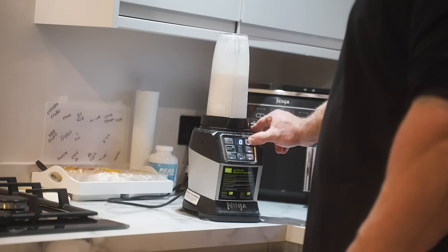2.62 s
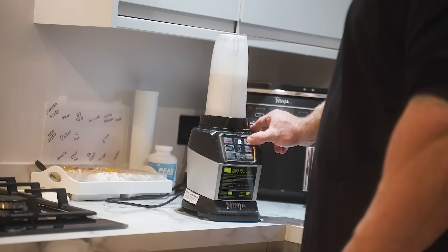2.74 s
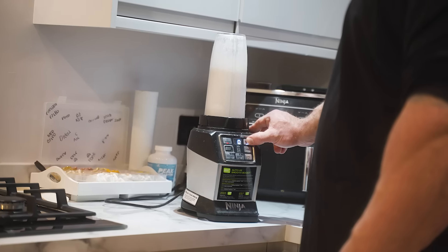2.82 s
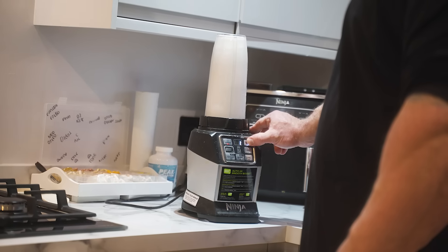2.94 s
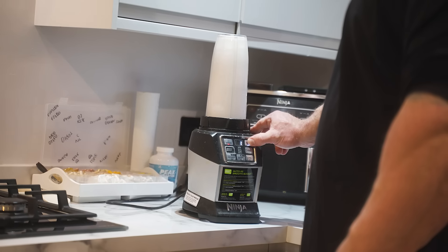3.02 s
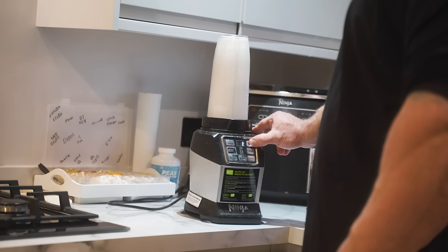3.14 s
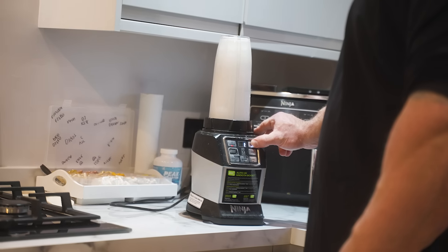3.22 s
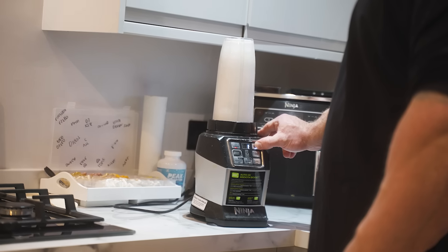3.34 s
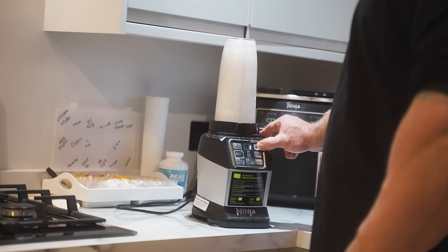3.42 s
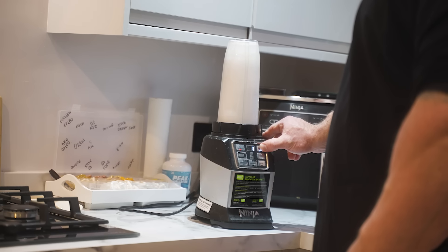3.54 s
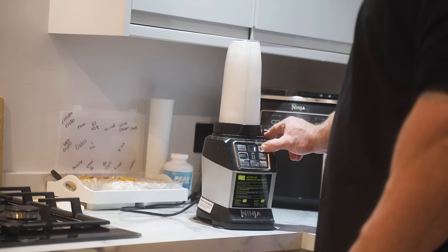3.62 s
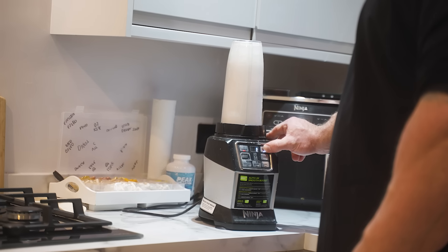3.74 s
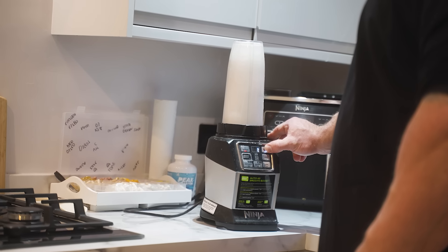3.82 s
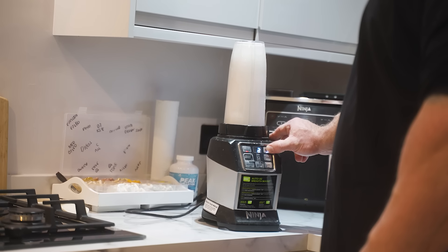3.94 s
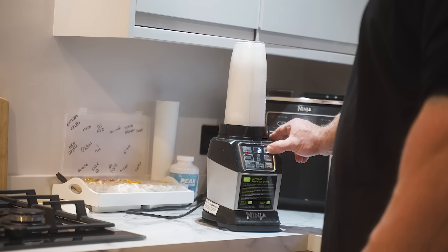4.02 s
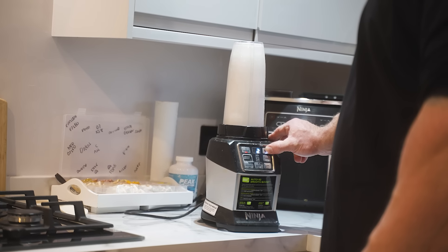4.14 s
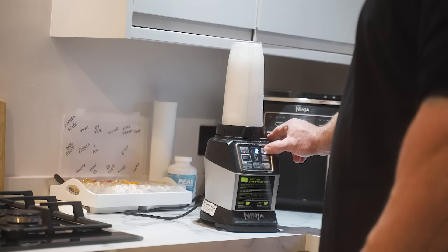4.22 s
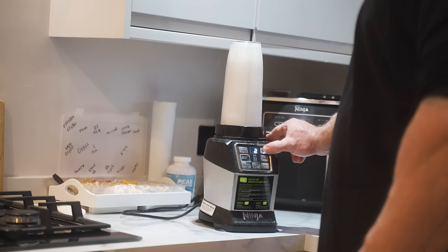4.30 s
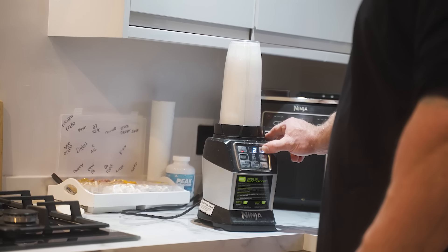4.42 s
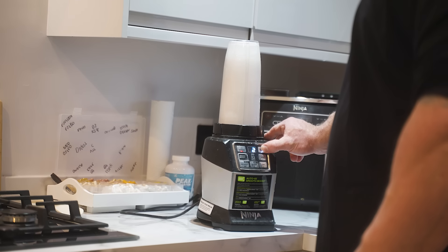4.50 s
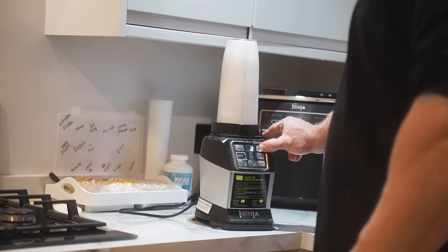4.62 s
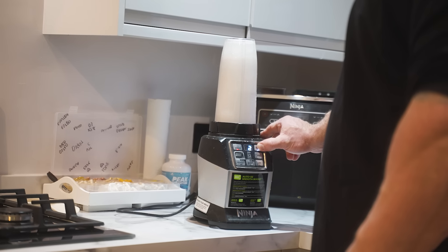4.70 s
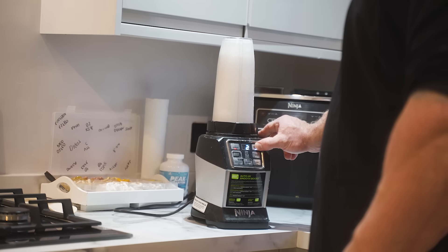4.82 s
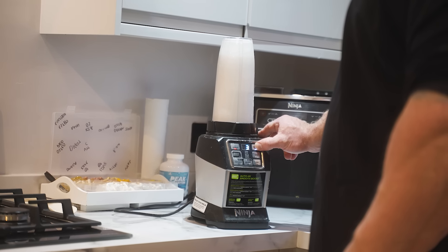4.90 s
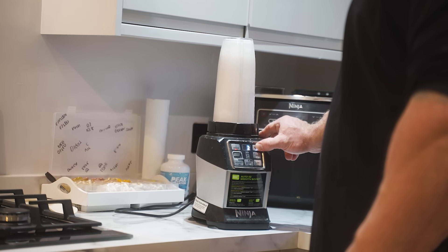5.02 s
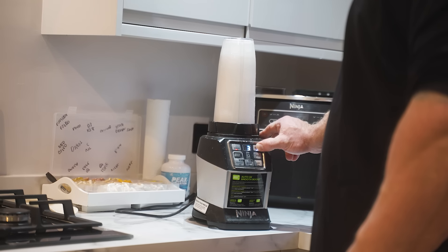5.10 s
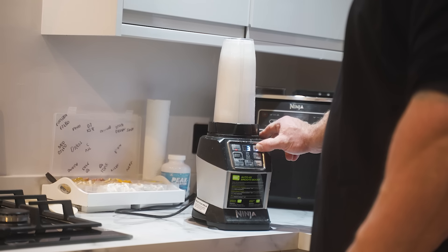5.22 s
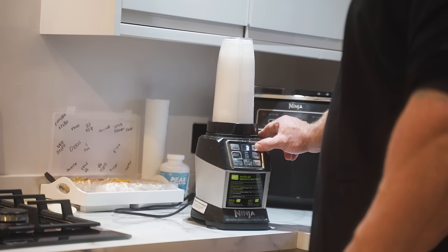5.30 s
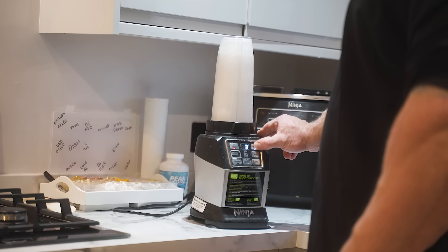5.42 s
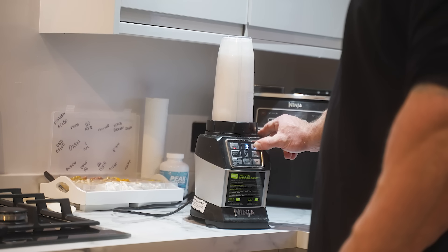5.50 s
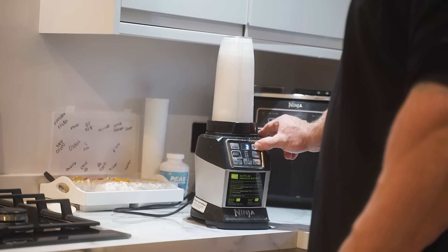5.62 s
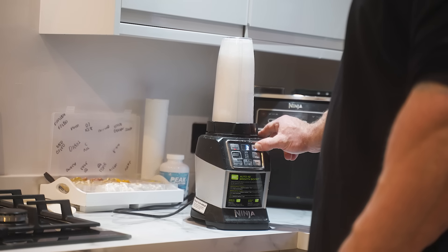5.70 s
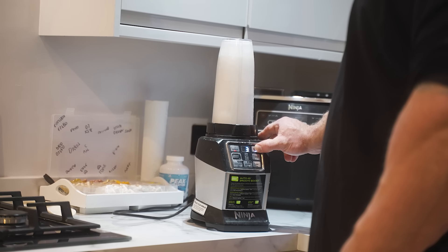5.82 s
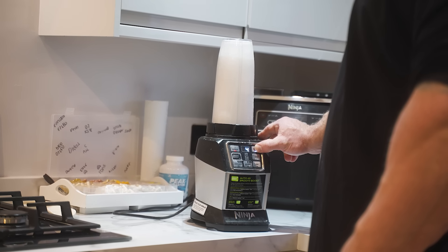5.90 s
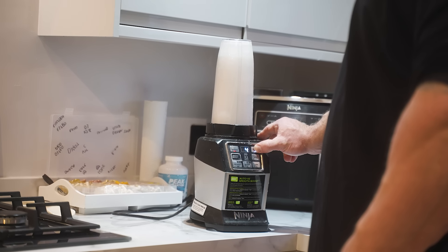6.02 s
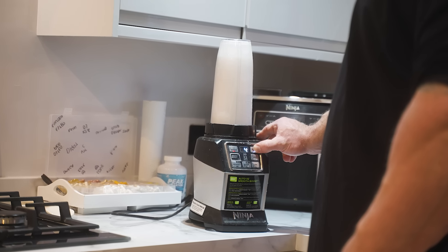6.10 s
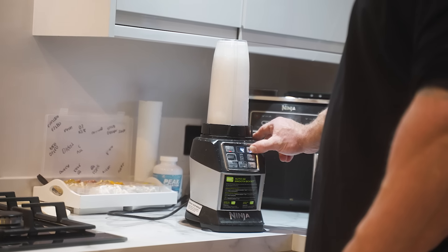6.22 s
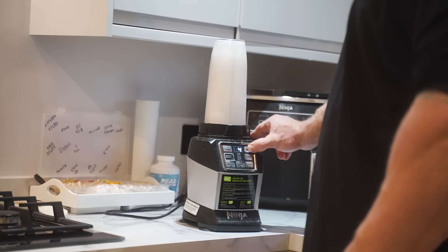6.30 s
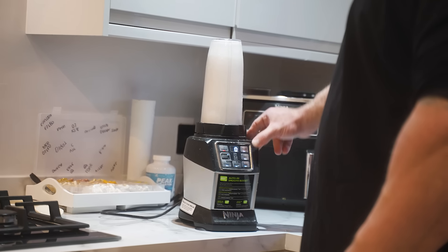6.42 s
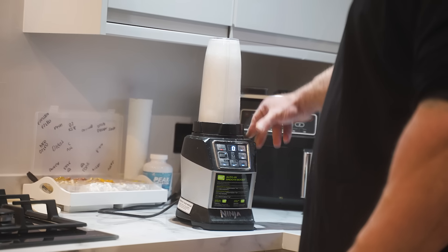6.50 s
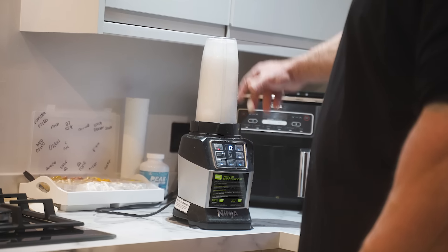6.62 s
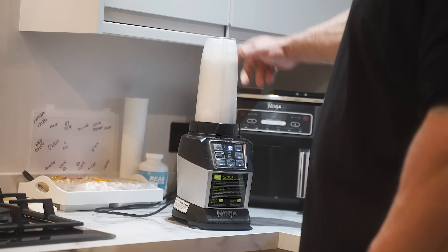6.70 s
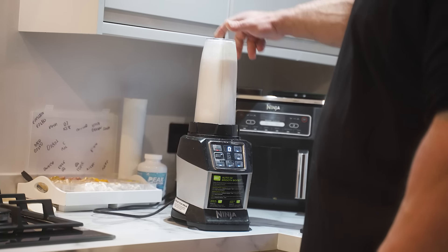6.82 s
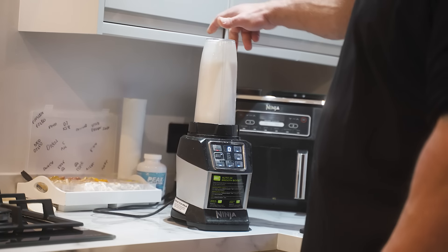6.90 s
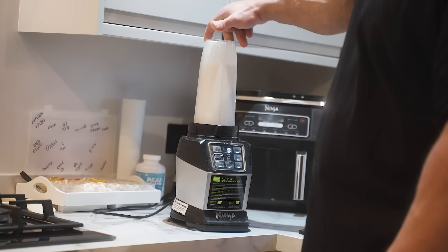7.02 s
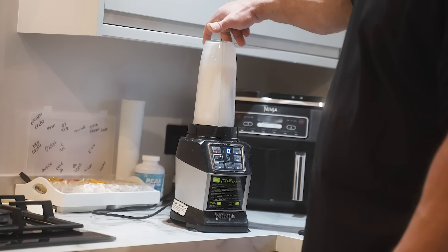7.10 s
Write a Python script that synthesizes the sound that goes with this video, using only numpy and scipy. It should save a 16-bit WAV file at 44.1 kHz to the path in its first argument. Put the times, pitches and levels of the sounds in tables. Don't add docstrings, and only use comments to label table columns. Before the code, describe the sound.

Close in a home kitchen, a small blender snaps on and roars through ice and slush for just over a second, then coasts down with lumps knocking the cup. A brief near-silence and a small click follow, then a longer, steady whirring roar of several seconds, falling in pitch at the end. Phone-like mono microphone, pauses gated to a faint hush.

```python
import sys
import numpy as np
from scipy import signal
from scipy.fft import rfft, irfft
from scipy.io import wavfile
from scipy.ndimage import uniform_filter1d

SR = 44100
rng = np.random.default_rng(int(sys.argv[2]) if len(sys.argv) > 2 else 0)


def how_loud(loudness_db):
    steps = np.asarray(loudness_db, float) / 20
    return 10 ** steps


def generate_wav(signal):
    frames = np.transpose(np.atleast_2d(signal))
    scaled = np.clip(frames, -1, 1) * 32767
    pcm = np.round(scaled).astype(np.int16)
    wavfile.write(sys.argv[1], SR, pcm)


N = 315315
T = np.arange(N) / SR
HZ = np.fft.rfftfreq(N, 1 / SR)

FULL_HZ, TOP_HZ = 289, 15760
COAST_S, FRICTION_HZ = 0.97, 75
FULL_CHURN_DB = -35
COAST_RING = 1.1
HUSH_DB, TAIL_S, HUSH_TREBLE_DB, RUMBLE_DB = -75, 0.035, -24.5, -89

# start in seconds, end in seconds.
RUNS_S = [
    (.1435, 2.678),
    (2.8045, 7.2),
]
# time in seconds, speed in Hz.
POWERED_HZ = [
    [(.144, 5), (.2, 170), (.3, 246), (.4, 267), (.5, 278), (.65, 291), (1, 294), (1.392, 292)],
    [(2.806, 5), (2.87, 170), (3, 243), (3.2, 285), (3.27, 289), (3.4, 285), (3.9, 288), (4.8, 289.5),
     (6.45, 288.5)],
]
# time in seconds, level in dB.
CHURN_DB = [
    [(.15, -47), (.47, -33.5), (1.38, -35), (1.93, -47), (2.2, -50), (2.35, -51.5), (2.43, -56), (2.5, -57),
     (2.67, -62)],
    [(2.81, -45.5), (2.91, -41.5), (3.06, -38), (3.3, -34.5), (4.3, -35), (5.3, -35.5), (6.44, -35.5),
     (6.9, -47), (7.15, -50.5)],
]
ROAR_EDGES_HZ = [1500, 4400, 8800]
# level in dB at full churn, gain in dB per dB of weaker churn,
# growth in dB per second as ice gets finer, change in dB once the blade slows.
ROAR_SHARES = [
    (-5, 0.29, 0.32, -0.05),
    (-0.1, 0.0617, 0.13, -0.4),
    (-11, 0.26, .5, -3.5),
    (-23, 0.26, .1, -3.5),
]
# frequency in Hz, level in dB per Hz.
FAST_COLOUR = [(53, -72), (90, -32.5), (290, -3.5), (338, -4.5), (515, -4), (578, -7.5), (649, -6),
               (865, 0), (1630, -15), (2010, -2.5), (2340, -5.5), (3370, 1), (4330, -12), (8800, -17),
               (11400, -50), (19400, -120)]
# frequency in Hz, level in dB per Hz.
SLOW_COLOUR = [(53, -86), (90, -50), (169, -22.5), (307, 0.5), (386, -5), (409, -9.5), (771, -4.5),
               (1480, -12), (2050, -5.5), (2390, -9), (3120, -4), (5240, -19.5), (8800, -29.5),
               (11400, -65), (19400, -120)]
# frequency in Hz, level in dB per Hz.
AIR_COLOUR = [(4710, -30), (8000, -24), (8720, -32), (8950, -9.5), (11200, -9), (14100, -11),
              (15600, -15.5)]
# frequency in Hz, width in Hz, lift in dB.
BODY_MODES = [(162.3, 24, 9.5), (290, 49, 0), (738, 38, 3), (890, 55, 1.5), (2066, 31, 3.5), (2044, 42, 2),
              (2930, 124, 3.5), (3370, 63, 0.5), (3750, 150, 4.5), (3990, 25, 5), (4540, 18, -0.5),
              (8820, 290, -5), (10500, 320, 5)]
# first pulse level in dB, second pulse level in dB,
# loss in dB per Hz under full speed powered, the same coasting.
UNBALANCE = [(-44.5, -44.5, .25, .11), (-55, -47.5, .2, .25), (-62, -48, .3, .1)]
# flutter in dB, wander in Hz per order.
WOBBLE = [(1.0, .6), (1.2, .6), (4.5, 2.5)]
# time in seconds, length in seconds, level in dB.
JOLTS = [
    [(1.3, 0.18, -55), (3.3, 0.12, -47), (3.65, 0.45, -47.5)],
    [(.38, 0.2, -48.5), (.57, 0.099, -46), (1.42, 0.13, -49), (3.29, 0.028, -45)],
    [(.45, 0.16, -39), (3.0, 0.1, -52), (4.45, 0.41, -45), (4.85, 0.065, -36.5), (5.8, 0.3, -48.5),
     (6.06, 0.055, -40), (6.36, 0.072, -44.5)],
]
TONE_ORDERS = [1.505, 2.42, 5.3, 7.58, 8.585, 9.585, 10.19, 11.24, 11.87, 13.01, 13.8, 16.2, 24.1, 27.5]
# first pulse level in dB, level in dB at 4 s, growth in dB per second.
TONE_LEVELS = [(-55, -52, -.5), (-58, -61.5, -.4), (-54.5, -55.5, -1), (-50, -47, -1), (-56, -47.5, 2),
               (-41.5, -44.5, 3), (-47, -49, 1.5), (-47, -44, 1), (-43, -43.5, 1), (-48, -54, 2),
               (-50, -48.5, 2.7), (-62.5, -53, -2), (-82, -77, 3), (-80, -69, 5.5)]
FAINT_ORDERS = [1.505, 13.8]
FAN_ORDERS = [7.58, 11.87]
# start in seconds, end in seconds, pitch in Hz, level in dB.
SQUEALS = [
    (0.58, 0.88, 4720, -49),
    (1.2, 1.4, 5330, -53),
    (1.15, 1.22, 770, -41.5),
    (3.3, 3.43, 3940, -43),
    (4.3, 6.3, 8446, -60),
    (5.15, 5.85, 8450, -58),
]
# shaft order, level in dB.
BARS = [(48, -72), (72, -75), (96, -78), (120, -81), (144, -83), (168, -86), (192, -88)]
# time in seconds, peak in dB, treble in dB, T60 in seconds.
KNOCKS = [(0.141, -20.5, -34, 0.24), (0.157, -21, -21, 0.099), (1.918, -25.5, -25, 0.43),
          (2.114, -35, -16, 0.15), (2.154, -28.5, -26, 0.18), (2.204, -27, -26, 0.11),
          (2.3, -22, -24, 0.14), (2.35, -31.5, -13, 0.23), (2.396, -35, -33, 0.22), (2.459, -21, -21, 0.19),
          (2.505, -37, -16, 0.18), (2.539, -51, -12, 0.15), (2.569, -29.5, -27, 0.11),
          (2.6, -35.5, -19, 0.3), (2.659, -46, -19, 0.15), (2.807, -23.5, -18, 0.086),
          (2.887, -16, -25, 0.23)]
# time in seconds, peak in dB, pitch in Hz, length in seconds.
TICKS = [
    (0.083, -85, 10500, 0.017),
    (0.13, -78, 11600, .012),
    (2.785, -78, 11700, .008),
    (2.793, -58, 900, 0.011),
    (2.796, -62, 2200, .009),
    (2.797, -61, 3700, 0.0075),
]
# frequency in Hz, level in dB per Hz.
HUSH_COLOUR = [(24, -27), (40, 1), (75, -7), (139, -23), (205, -15), (516, -10), (1240, -18), (1740, -12),
               (2340, -11), (3710, -7.5), (13500, -30)]
# start in seconds, level in dB over the hush.
STOPS = [
    (0, 17),
    (2.678, 14),
]


def noise():
    return rng.standard_normal(N)


def unit(x):
    return x / np.sqrt(np.mean(x ** 2))


def curve(tables):
    table = np.array(sum(tables, []))
    return np.interp(T, table[:, 0], table[:, 1])


def inside(start_s, end_s):
    return np.clip(np.minimum(T - start_s, end_s - T) * 1000, 0, 1)


def colour_db(points):
    points = np.array(points)
    return np.interp(np.log(HZ + 1), np.log(points[:, 0]), points[:, 1])


def band_gain(lo_hz, hi_hz):
    return 1 / np.sqrt((1 + (lo_hz / (HZ + 1)) ** 16) * (1 + (HZ / hi_hz) ** 16))


def band(x, lo_hz, hi_hz):
    return irfft(rfft(x) * band_gain(lo_hz, hi_hz), N)


def walk(rate_hz):
    held = np.repeat(rng.standard_normal(int(rate_hz * N / SR) + 2), 8)
    slewed = unit(uniform_filter1d(uniform_filter1d(held, size=8), size=8))
    return np.interp(T * rate_hz * 8, np.arange(len(held)), slewed)


def tone(order, speed_hz, turn, blur_hz):
    drift = np.cumsum(blur_hz * order * walk(40)) * 2 * np.pi / SR
    return np.sqrt(2) * np.sin(order * turn + drift) * (order * speed_hz < .45 * SR)


def shaft_speed():
    speed_hz = curve(POWERED_HZ)
    for pulse, (_, stop_s) in zip(POWERED_HZ, RUNS_S):
        off_s, top_hz = pulse[-1]
        coast_hz = (top_hz + FRICTION_HZ) * np.exp((off_s - T) / COAST_S) - FRICTION_HZ
        unpowered = (T > off_s) & (T < stop_s + .12)
        speed_hz = np.where(unpowered, np.maximum(coast_hz, 5), speed_hz)
    return speed_hz


def body_db():
    return sum(db / (1 + (2 * (HZ - hz) / width_hz) ** 2) for hz, width_hz, db in BODY_MODES)


def kitchen():
    step = int(18 / HZ[1])
    ripple = uniform_filter1d(np.repeat(rng.standard_normal(len(HZ) // step + 1), step), step)
    return how_loud(2.2 * unit(ripple[:len(HZ)]))


def roar(speed_hz, turn):
    chips = (rng.random(N) < 1500 / SR) * noise() * how_loud(1.66 * rng.exponential(size=N))
    throb = 1 + .09 * np.cos(turn)
    body = body_db()
    drive = rfft(throb * (noise() + .2 * unit(chips))) * how_loud(body) * kitchen()
    fast = np.clip((speed_hz - 120) / 150, 0, 1)
    slowed = np.clip((FULL_HZ - speed_hz) / 70, 0, 1)
    churn_db = curve(CHURN_DB)
    limits_hz = [1, *ROAR_EDGES_HZ, SR]
    slow_gain = how_loud(colour_db(SLOW_COLOUR) + COAST_RING * body)
    fast_gain = how_loud(colour_db(FAST_COLOUR))
    air_gain = how_loud(colour_db(AIR_COLOUR))
    gains = 3 * [(slow_gain, fast_gain)] + [(air_gain, air_gain)]
    out = np.zeros(N)
    for k, (share_db, weak_gain, finer, slow_db) in enumerate(ROAR_SHARES):
        part = drive * band_gain(limits_hz[k], limits_hz[k + 1])
        slow_part, fast_part = (unit(irfft(part * gain, N)) for gain in gains[k])
        db = churn_db + share_db + weak_gain * (FULL_CHURN_DB - churn_db)
        db = db + finer * (T - 4) + slow_db * slowed
        slosh_db = (0.5 + 1.06 * (1 - fast)) * walk(14)
        out += how_loud(db + slosh_db) * (slow_part * (1 - fast ** 2) ** .5 + fast_part * fast)
    return out


def swish(speed_hz, turn):
    gusts = unit(band(noise(), 1, 110))
    stall = np.interp(speed_hz, [205, 240, 272, 288], [0, 1, 1, .45])
    return how_loud(curve(CHURN_DB) - 3.5) * stall * gusts * np.sin(11.7 * turn)


def unbalance(speed_hz, turn):
    out = np.zeros(N)
    coasting = np.gradient(speed_hz) < -50 / SR
    rows = zip(UNBALANCE, WOBBLE, JOLTS)
    for k, ((first_db, second_db, loss, coast_loss), (flutter_db, wander_hz), jolts) in enumerate(rows):
        db = np.where(T < RUNS_S[1][0], first_db, second_db)
        db = db - np.where(coasting, coast_loss, loss) * np.maximum(FULL_HZ - speed_hz, 0)
        flare = sum(how_loud(peak_db) * np.exp(-(2 * (T - s) / length_s) ** 2) for s, length_s, peak_db in jolts)
        level = (how_loud(db + flutter_db * walk(20)) + flare) * np.clip((speed_hz - 145) / 50, 0, 1)
        out += level * tone(k + 1, speed_hz, turn, wander_hz)
    return out


def bearings(speed_hz, turn):
    out = np.zeros(N)
    for order, (first_db, level_db, growth) in zip(TONE_ORDERS, TONE_LEVELS):
        db = np.where(T < RUNS_S[1][0], first_db, level_db + growth * (T - 4))
        db = db + 2.5 * walk(30) + 1.2 * walk(6) - 4 * (order in FAINT_ORDERS)
        steepness = 2 if order in FAN_ORDERS else 16
        rise = np.clip((speed_hz - 225) / 30, 0, 1) * np.minimum(speed_hz / FULL_HZ, 1) ** steepness
        out += how_loud(db) * rise * tone(order, speed_hz, turn, .55)
    return out


def squeals():
    out = np.zeros(N)
    for start_s, end_s, hz, db in SQUEALS:
        swell = np.sin(np.pi * np.clip((T - start_s) / (end_s - start_s), 0, 1)) ** .5
        out += how_loud(db + 2 * walk(25)) * swell * tone(hz, 1, 2 * np.pi * T, 9 / hz)
    return out


def commutator(speed_hz, turn):
    out = np.zeros(N)
    lift_db = body_db()
    coasting = np.gradient(speed_hz) < 0
    for order, db in BARS:
        hz = order * speed_hz
        ring_db = np.interp(hz, HZ, lift_db) - 150 * np.clip(8600 / hz - 1, 0, 2) - 5 * (hz > 14800)
        heard = coasting | ((order == 48) & (speed_hz > 235))
        out += how_loud(db + ring_db + 2.5 * walk(60)) * heard * tone(order, speed_hz, turn, .9)
    return out


def knocks():
    ring = unit(irfft(rfft(noise()) * how_loud(colour_db(SLOW_COLOUR) + 0.9 * body_db()), N))
    splash = unit(band(noise(), 4600, 13000))
    out, age_s = np.zeros(N + SR), T[:SR // 2]
    for s, db, treble_db, t60_s in KNOCKS:
        at = slice(int(s * SR), int(s * SR) + len(age_s))
        fade = np.minimum(age_s / 0.0018, 1) * how_loud(-60 * age_s / max(t60_s, .02))
        treble = how_loud(treble_db + 5) * splash[at] * how_loud(-60 * age_s / 0.44)
        out[at] += how_loud(db - 17) * fade * (ring[at] + treble)
    return out[:N]


def ticks():
    out = np.zeros(N)
    for s, db, hz, length_s in TICKS:
        sos = signal.butter(4, [hz - 600, hz + 600], "band", fs=SR, output="sos")
        out += how_loud(db - 6) * inside(s, s + length_s) * unit(signal.sosfilt(sos, noise()))
    return out


def pauses():
    ring = 1 + 1.5 / (1 + ((HZ - 3800) / 120) ** 2)
    hush = irfft(rfft(noise()) * how_loud(colour_db(HUSH_COLOUR)) * ring, N)
    low, high = unit(band(hush, 90, 6500)), unit(band(hush, 8300, 12800))
    tail_db = sum(db * np.exp(-np.abs(T - s) / TAIL_S) * (T >= s) for s, db in STOPS)
    out = how_loud(HUSH_DB + tail_db) * (low + how_loud(HUSH_TREBLE_DB + tail_db) * high)
    hum = how_loud(-79) * (T > 2.66) * unit(band(noise(), 135, 170))
    return out + hum + how_loud(RUMBLE_DB - 2) * unit(band(noise(), 12, 80))


def stray_treble(mono, count):
    side, size = np.zeros(N), 2048
    hz = np.fft.rfftfreq(size, 1 / SR)
    for when, where in rng.random((count, 2)):
        start = int(when * (N - size))
        at = slice(start, start + size)
        lo_hz = 4200 + 9500 * where ** 1.3
        patch = irfft(rfft(mono[at][::-1]) * ((hz > lo_hz) & (hz < lo_hz + 2000)))
        side[at] += patch * .8 * np.hanning(size) ** .5
    return side


def scene():
    speed_hz = shaft_speed()
    turn = 2 * np.pi * np.cumsum(speed_hz) / SR
    gate = sum(inside(*run) for run in RUNS_S)
    motor = unbalance(speed_hz, turn) + bearings(speed_hz, turn) + squeals() + commutator(speed_hz, turn)
    machine = roar(speed_hz, turn) + swish(speed_hz, turn) + motor + knocks()
    bass_cut = signal.butter(4, 70, "high", fs=SR, output="sos")
    mono = signal.sosfilt(bass_cut, gate * machine) + ticks() + pauses()
    return np.array([mono, mono])


def low_pass(x):
    return signal.sosfilt(signal.butter(12, 15800, fs=SR, output="sos"), x)


def record(dry):
    side = stray_treble(dry[0], count=26)
    mix = irfft(rfft(dry + np.array([side, -side])) * (HZ < TOP_HZ), N)
    return low_pass(mix)


dry = scene()
out = record(dry)
generate_wav(out)
```